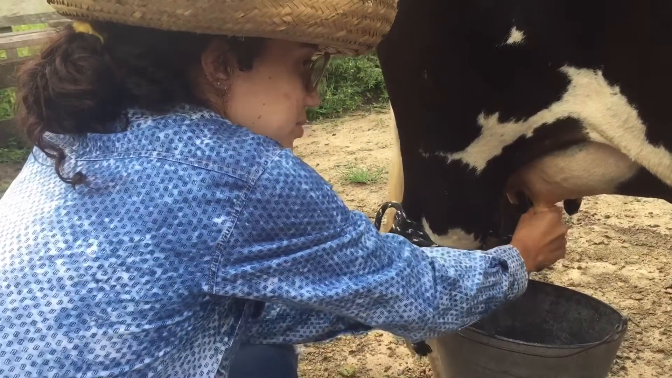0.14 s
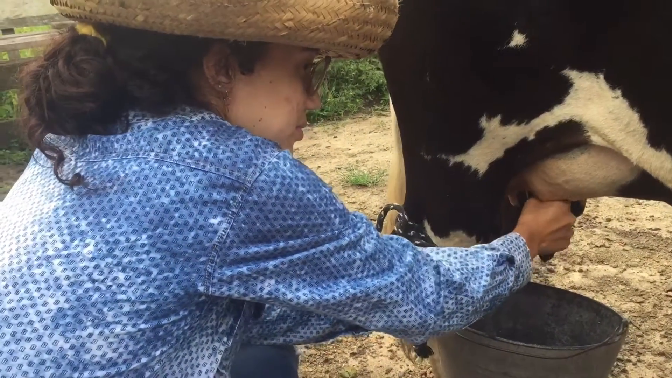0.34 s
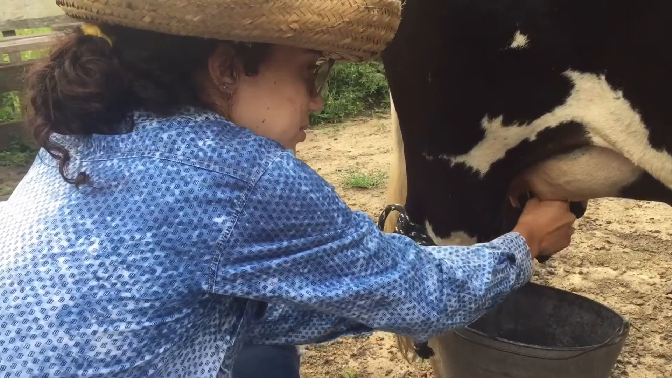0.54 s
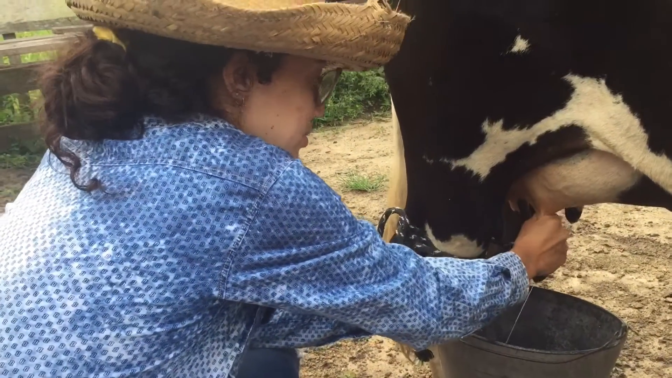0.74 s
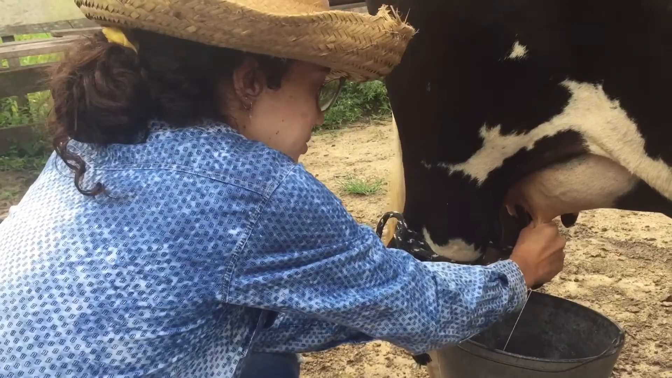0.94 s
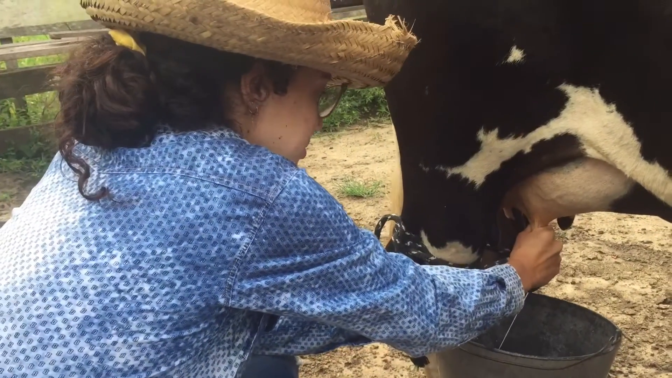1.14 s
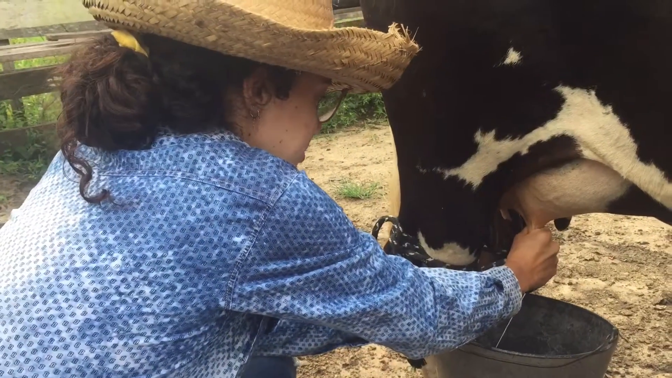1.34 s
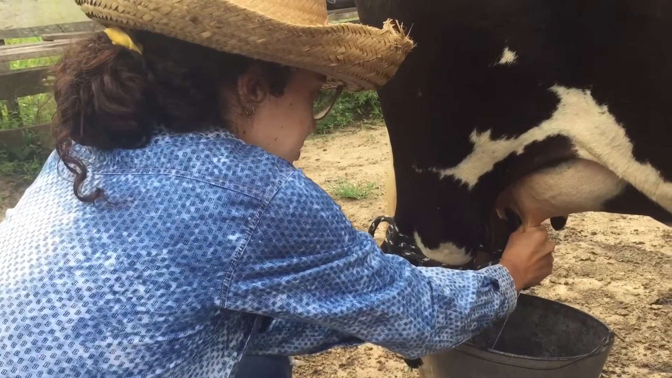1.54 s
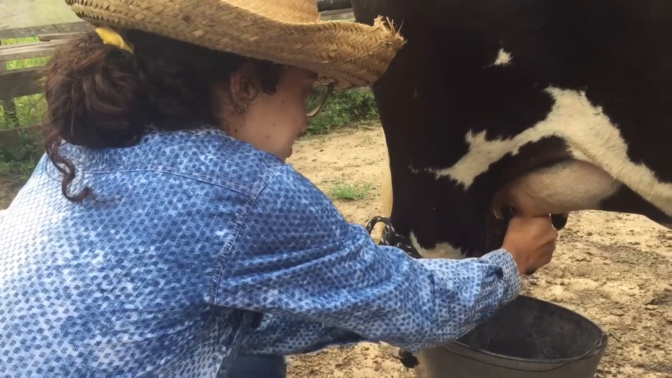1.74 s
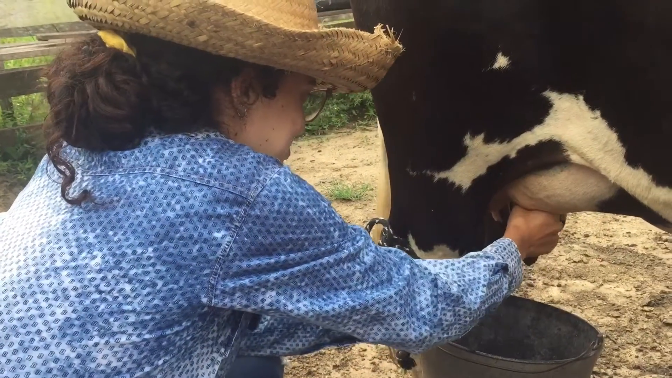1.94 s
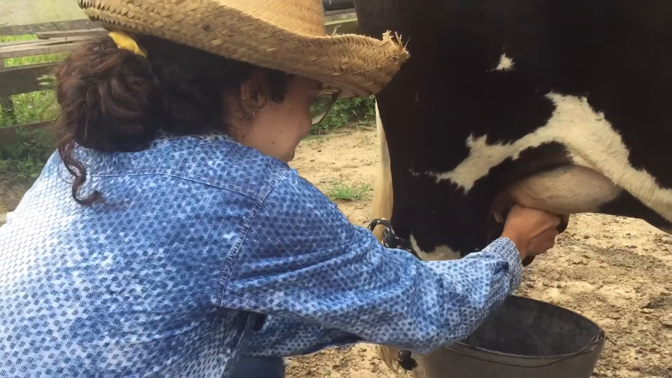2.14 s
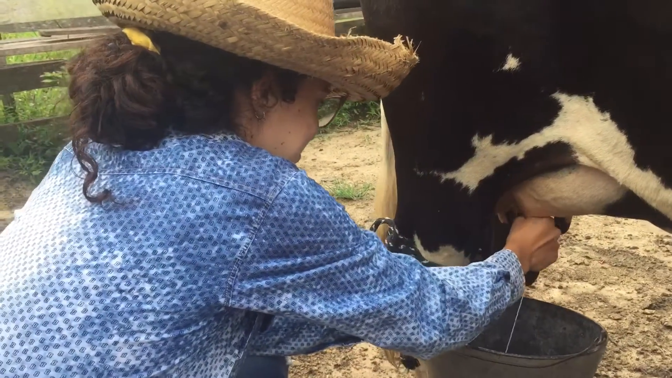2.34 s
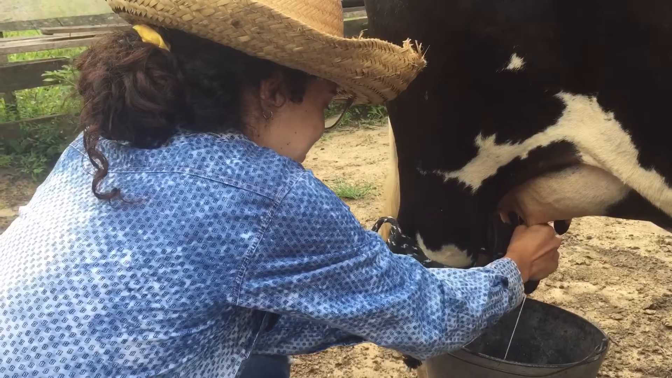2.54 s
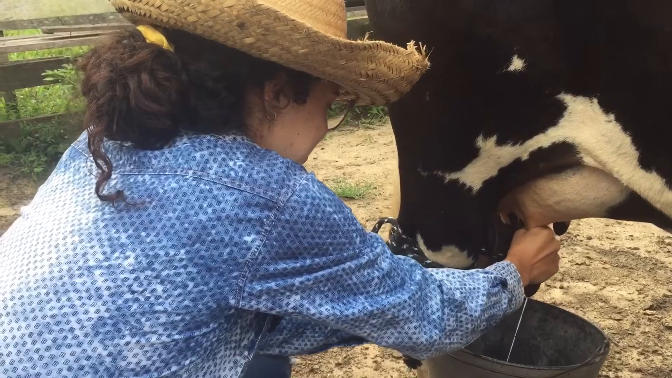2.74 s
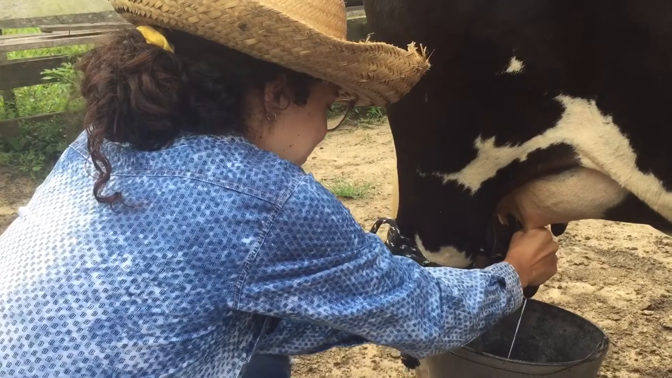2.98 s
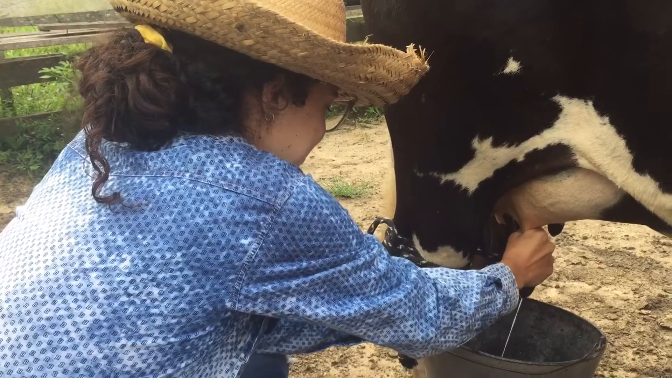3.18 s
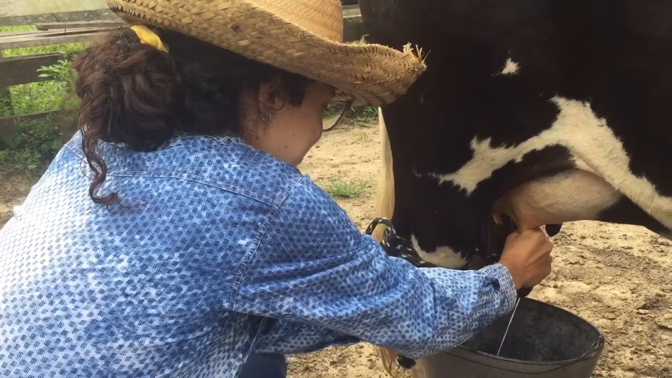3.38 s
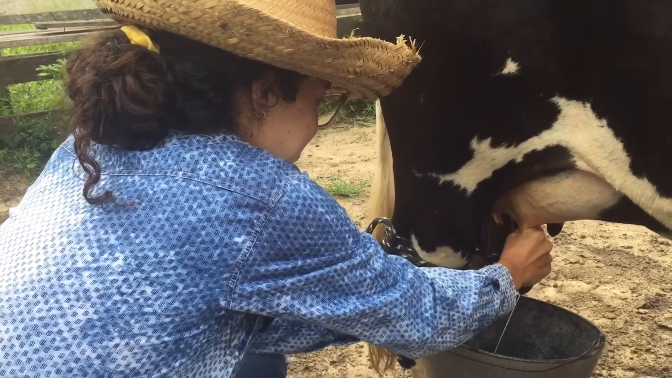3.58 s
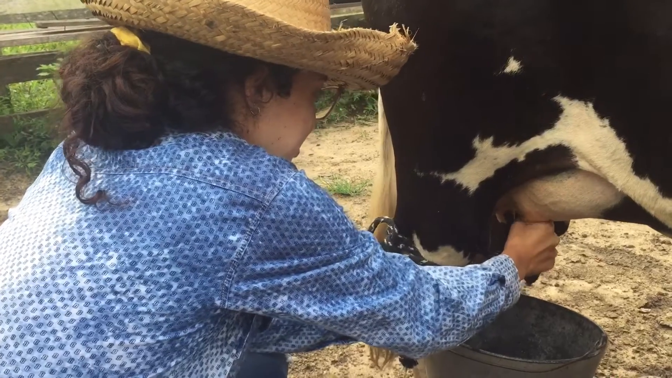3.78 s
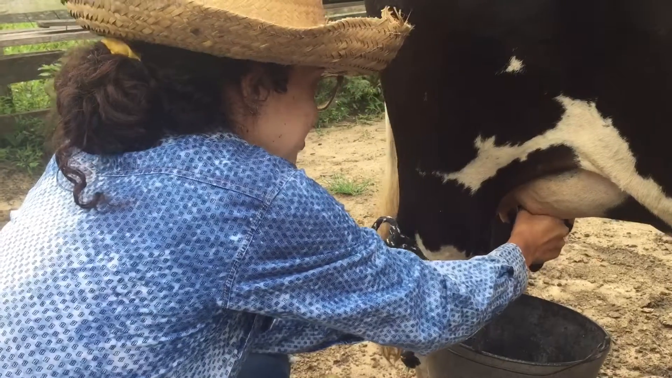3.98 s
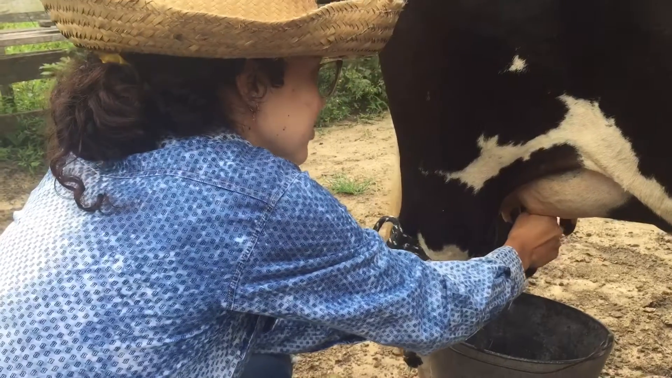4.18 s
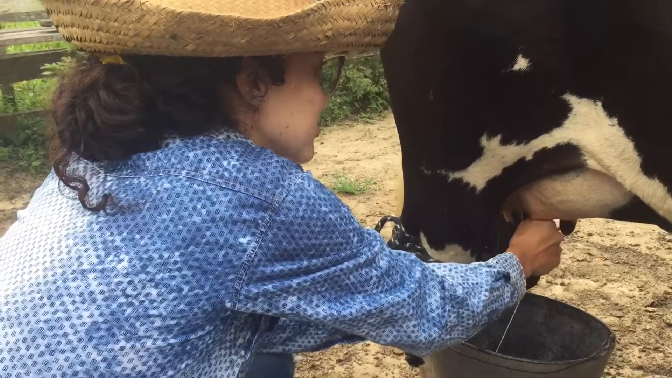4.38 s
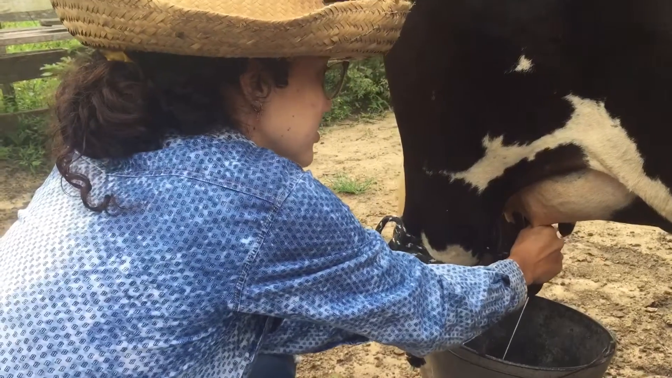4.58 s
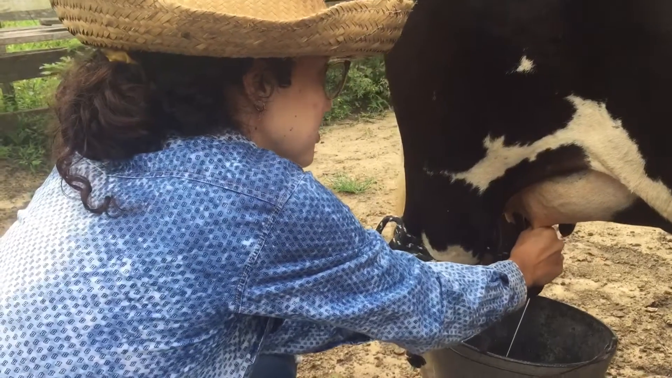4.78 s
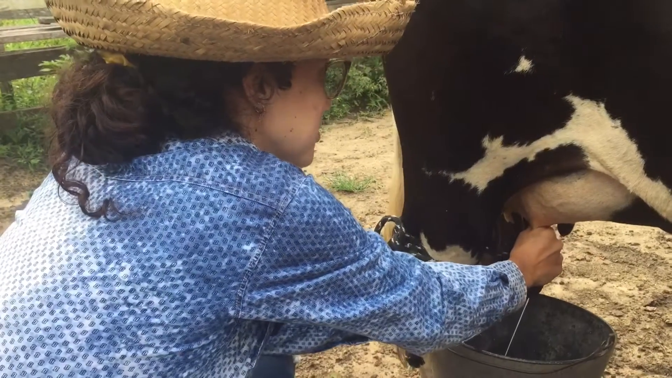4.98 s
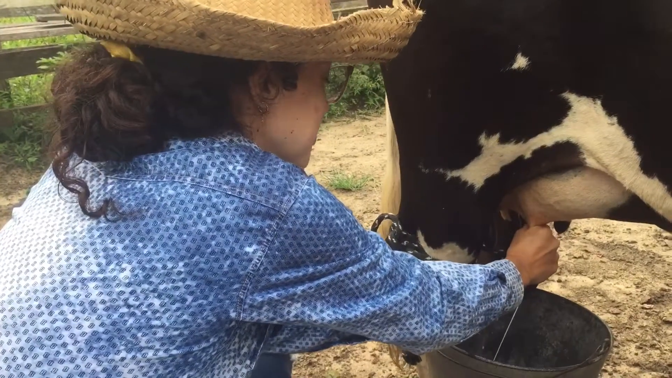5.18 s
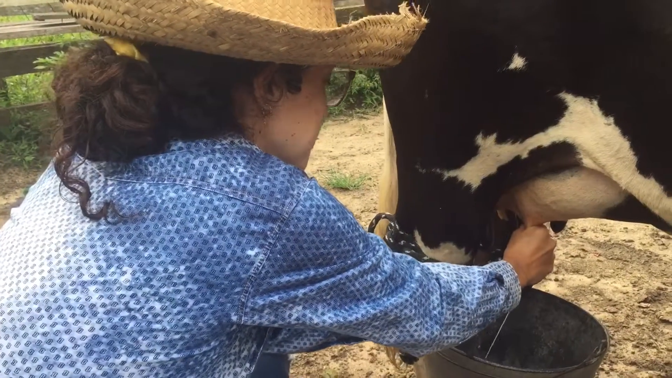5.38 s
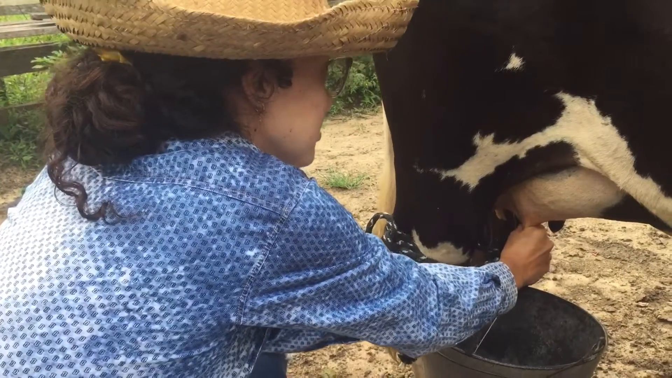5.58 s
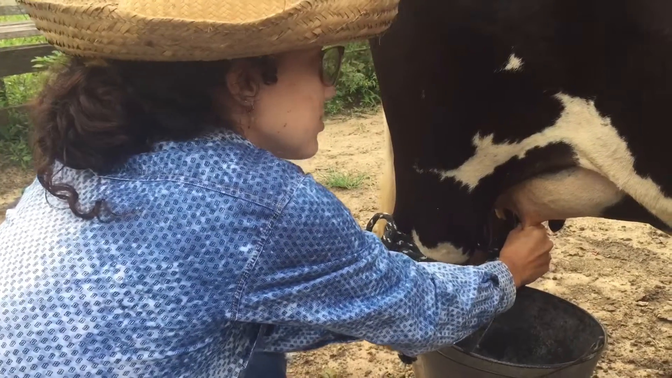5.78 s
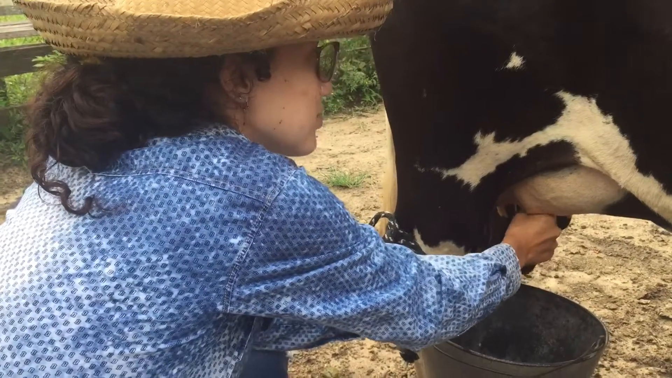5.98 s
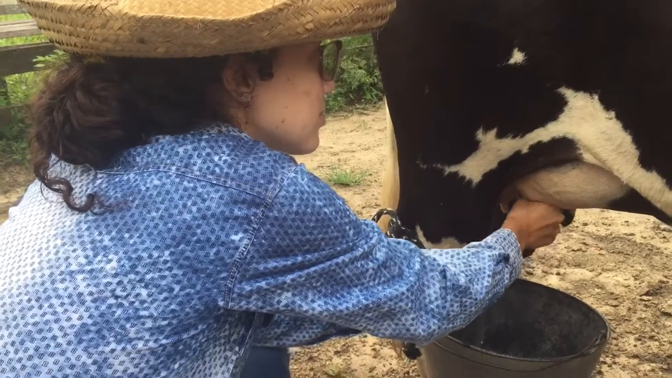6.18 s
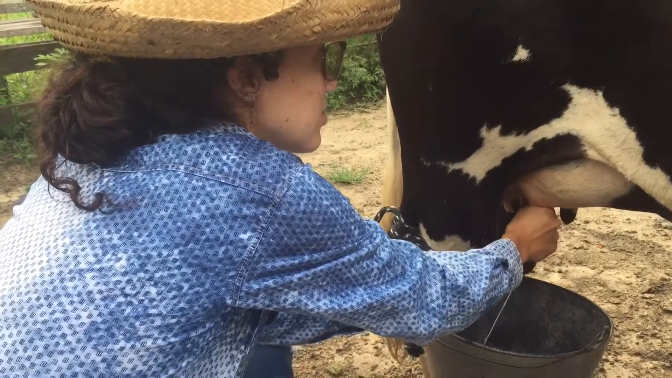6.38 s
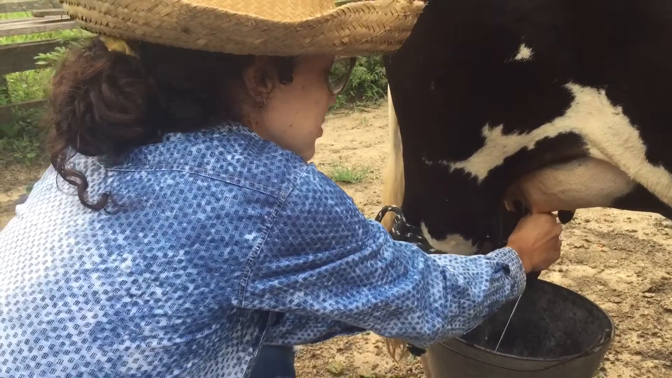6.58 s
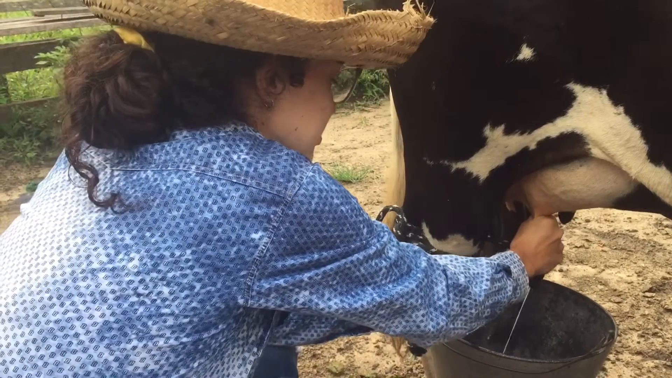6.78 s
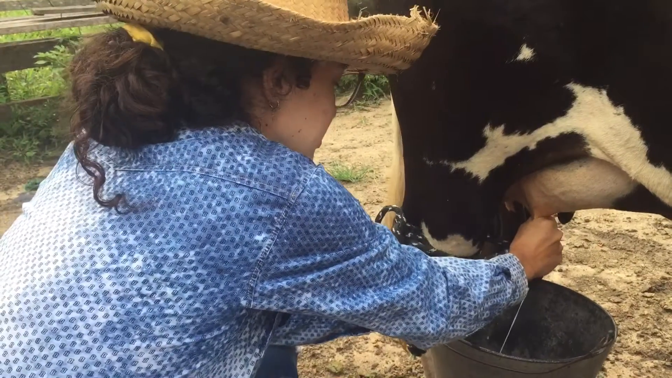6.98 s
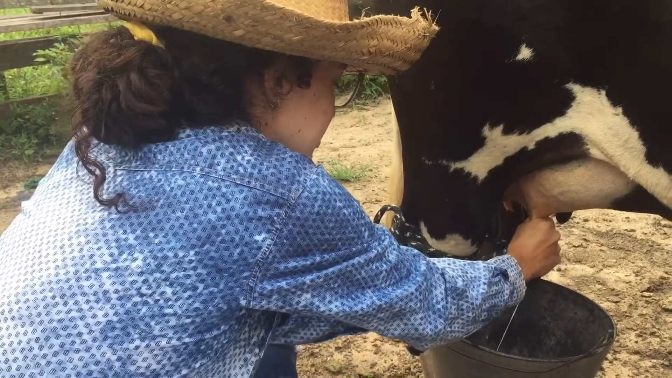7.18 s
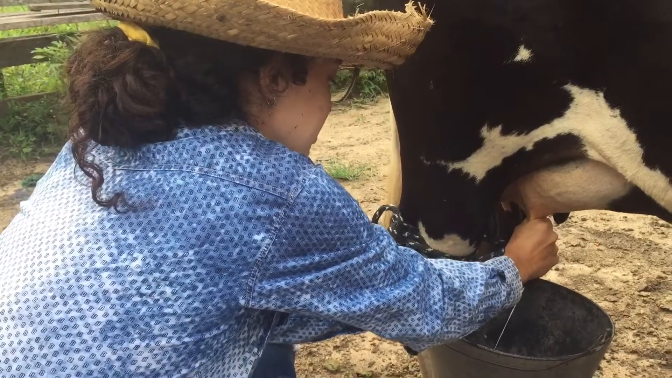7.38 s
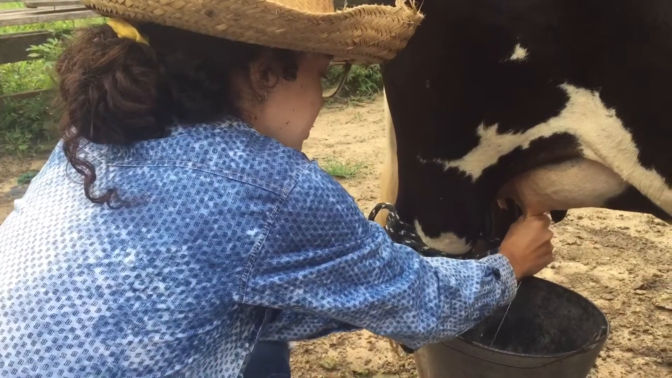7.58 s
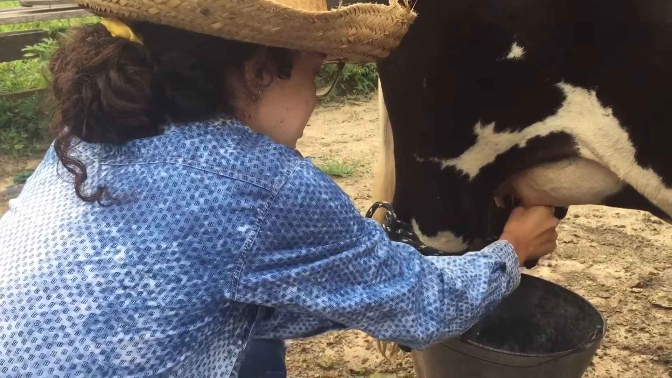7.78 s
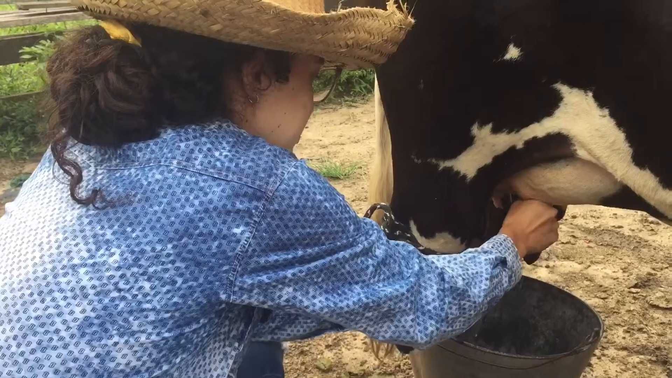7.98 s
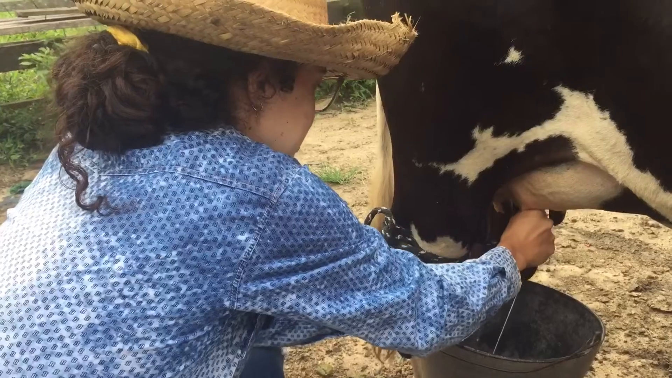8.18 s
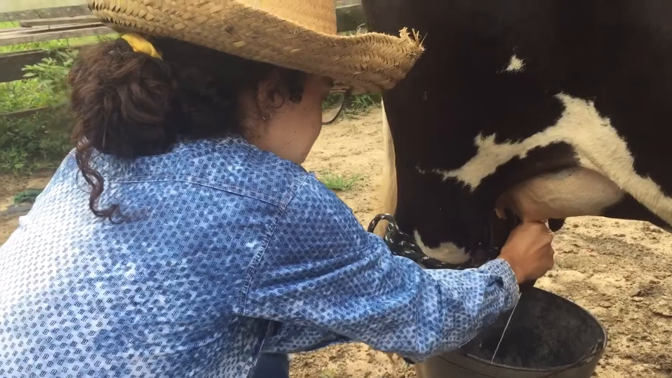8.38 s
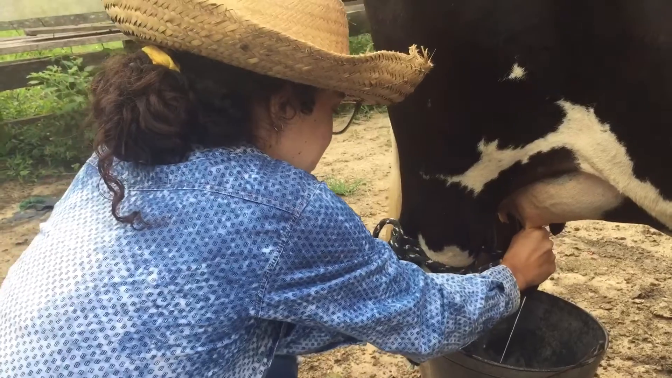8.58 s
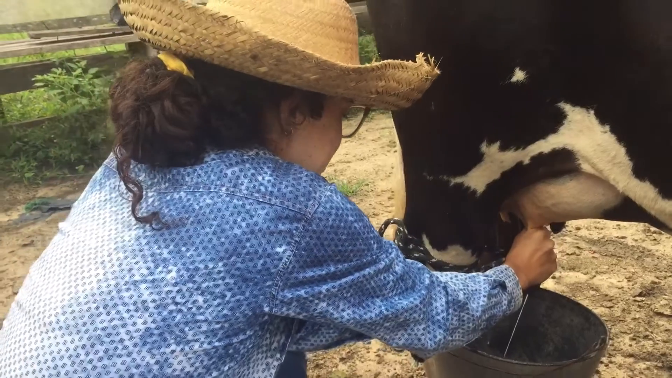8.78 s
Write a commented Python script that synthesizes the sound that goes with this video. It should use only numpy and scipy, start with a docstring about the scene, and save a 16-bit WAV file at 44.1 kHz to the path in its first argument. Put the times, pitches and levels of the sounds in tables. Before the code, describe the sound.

Four long hissing squirts of milk drum into a metal pail outdoors, with cicadas buzzing and chirping and wind bumping the microphone.

```python
"""Four long squirts of milk, drawn from a cow by hand, break into drops that drum in a metal pail outdoors.
Random impacts excite the modes of the pail, its air and its milk; bubbles, spray and wall grazes join them.
Between squirts a slack stream, the same impacts muffled by froth, lands softly, and stray drops snap.
Cicadas buzz and chirp as modulated narrow-band noise and tone; far birds call as resonant noise.
Puffs of wind bump the microphone as short swings of slowing frequency over a rumble and quiet air."""
import sys
import numpy as np
from scipy import signal
from scipy.fft import rfft, irfft, next_fast_len
from scipy.io import wavfile
from scipy.ndimage import uniform_filter1d, map_coordinates

SR = 44100
rng = np.random.default_rng(int(sys.argv[2]) if len(sys.argv) > 2 else 0)


def to_wav(s):
    """Save 16-bit WAV."""
    ch = np.atleast_2d(s).T  # columns
    pcm = np.round(np.clip(ch, -1, 1) * 32767)  # PCM
    wavfile.write(sys.argv[1], SR, pcm.astype(np.int16))


N = 389403

# Levels called nominal are shifted by a constant where they are used.
# Squeezes of the teat: start t/s, crest t/s, end t/s, nominal patter level at the crest/dB,
# swell up to the crest/dB, sag after it/dB, air resonance of the pail f/Hz,
# then nominal levels relative to the patter: boom/dB, drumming/dB, wall ring/dB, initial hiss/dB
SQUEEZES = [(2.414, 2.76, 3.547, -44.5, 14.5, 1, 383, -4, -3.5, -2, 0.5),
            (4.512, 4.827, 5.5, -43.5, 9, 8, 369.7, -2, -5, -7.5, 0),
            (6.659, 7.045, 7.562, -43.5, 7.5, 12, 349.5, -3.5, -2.5, -0.5, 0.5),
            (8.23, 8.327, 9.05, -45, -0.5, 1, 352, -2, -0.5, -4.5, -1.5)]
# Modes of the pail: f/Hz, width/Hz, mean level/dB
PAIL_MODES = [(645, 71, -1.5), (927, 56, -0.5), (1135, 83, -1), (1390, 66, 0.5), (1610, 38, -1),
              (1732, 65, -1), (1950, 92, -3.5), (2270, 57, -5), (2470, 80, -6), (2846, 44, -2),
              (3090, 72, -4), (3375, 61, -5), (3640, 89, -2), (4000, 110, -6.5)]
# Colours of the splash, as filter curves: f/Hz, relative level/dB
PATTER_COLOUR = [(850, -38.5), (1120, 2.5), (1950, 2), (2200, -3), (2600, -27)]
HISS_COLOUR = [(1800, -14), (2250, 2.5), (3300, 1), (4400, -0.5), (4900, 1), (7800, -2.5), (9500, -70)]
SPRAY_COLOUR = [(6000, -76), (7800, -1), (9000, 5), (10300, -2.5), (11500, 0.5), (16000, 0)]
# The bottom, damped by milk to a broad hump: f/Hz, relative level/dB
BOTTOM_COLOUR = [(360, -18), (500, -12.0), (630, 2.5), (780, 1.0), (1000, 8.5), (1250, -28)]
# The jet strays onto the wall and rings one of its modes: start t/s, end t/s, f/Hz, level/dB
WALL_GRAZES = [(2.667, 3.084, 1460, -43.5), (2.88, 2.98, 2490, -44.5), (3.073, 3.284, 1422, -40),
               (3.39, 3.58, 1710, -52.5), (4.606, 4.76, 1447, -46), (7.05, 7.5, 1440, -50.5),
               (6.95, 7.57, 1890, -51.5), (8.47, 8.612, 1397, -47), (8.61, 8.68, 3066, -45)]
# The air of the pail booms harder for a moment: start t/s, end t/s, f/Hz, level/dB
AIR_BOOMS = [(2.46, 2.65, 379.5, -43.5), (4.79, 4.9, 369, -39), (8.66, 8.79, 341, -42.5)]
# The jet digs a hole in the milk: start t/s, end t/s, from f/Hz, to f/Hz, level/dB
MILK_HOLES = [(2.412, 2.58, 1468, 780, -52.5), (4.66, 4.86, 1512, 598, -48.5), (4.7, 4.92, 2300, 1100, -54),
              (5.08, 5.3, 1205, 820, -52), (6.88, 7.16, 1048, 600, -59)]
# The jet fizzes in a band that slides as the squeeze goes on: start t/s, end t/s, from f/Hz, to f/Hz, level/dB
JET_FIZZES = [(4.58, 4.92, 3160, 4050, -58), (6.67, 6.98, 2460, 3040, -51.5),
              (6.7, 6.96, 4450, 4350, -58), (8.48, 8.86, 3810, 4170, -61)]
# The jet sputters into droplets as it starts or runs out: centre t/s, spread t/s, level/dB
SPUTTERS = [(2.448, 0.045, -62), (3.565, 0.044, -56), (3.68, 0.045, -70), (5.54, 0.054, -67.5),
            (6.6, 0.11, -73.5), (6.781, 0.063, -56.5), (7.6, 0.06, -77)]
# The slack stream: start t/s, crest t/s, end t/s, level/dB (a row that ends before it starts is silent)
SLACK_STREAMS = [(-.1, 0.036, 0.16, -58.5), (1.187, 1.4, 1.625, -60.5), (3.45, 3.593, 3.69, -52.5),
                 (4.374, 4.533, 4.83, -60), (5.422, 5.54, 5.61, -56.5), (5.593, 5.75, 5.92, -53.5),
                 (6.49, 6.607, 6.8, -52), (7.36, 7.53, 7.21, -49)]
# Filter curve of the froth: f/Hz, relative level/dB
FROTH_COLOUR = [(850, -11.5), (1320, 11.5), (1950, 7.5), (2300, -3), (3800, -12), (5000, -9), (9000, -16)]
# Last drops that plop into the milk: t/s, level/dB
LAST_DROPS = [(1.048, -44), (3.688, -46), (5.547, -44.5)]
# Snaps: stray drops that snap on the wall, and at 4.532 s the jet's slap as the second squeeze begins: t/s,
# nominal level/dB, centre f/Hz
SNAPS = [(0.8684, -55, 12000), (2.4196, -44, 11000), (2.447, -34.5, 13100), (2.822, -50, 11500),
         (3.0142, -36, 14000), (3.251, -40, 12500), (3.5889, -34, 13000), (3.59, -36, 4370),
         (3.714, -51, 8000), (3.8066, -48.5, 4150), (4.532, -34.5, 2300), (5.2312, -46, 9900),
         (5.4946, -49, 11500), (6.7432, -45, 12500), (7.049, -39, 12000), (8.2284, -37, 12800),
         (8.631, -41.5, 9900)]
# Bands of the far cicadas: f/Hz, width/Hz, steady level/dB
CICADA_BANDS = [(5690, 450, -73.5), (6170, 150, -67), (6430, 750, -70.5), (7187, 150, -67.5)]
# Phrases that swell out of the chorus: start t/s, length t/s, final f/Hz, level/dB
CICADA_PHRASES = [(0.236, 0.84, 6310, -61.5), (1.014, 0.36, 5590, -64), (1.691, 0.83, 6330, -59.5),
                  (1.695, 0.64, 5470, -66), (2.923, 0.85, 6300, -56.5), (4.171, 0.47, 5630, -62.5),
                  (5.572, 0.83, 6280, -59), (6.846, 0.86, 6260, -61), (8.088, 0.42, 5620, -59.5)]
# Chirps of the near cicada: start t/s, end t/s, nominal level/dB
NEAR_CHIRPS = [(0.18, 0.401, -66), (0.396, 0.634, -51), (1.053, 1.333, -61.5), (1.702, 1.96, -51),
               (3.062, 3.298, -51), (3.937, 4.134, -52.5), (4.589, 4.822, -52.5), (5.342, 5.572, -50.5),
               (6.013, 6.244, -50), (6.8, 6.998, -56), (7.449, 7.701, -53), (8.217, 8.423, -55.5)]
# Faint far birds: start t/s, end t/s, f/Hz, level/dB
BIRD_CALLS = [(.26, 1.0, 2150, -75.5), (2.29, 2.39, 3340, -71)]
# Stronger puffs of wind: t/s, nominal level/dB, nominal upper-bass level relative to it/dB
WIND_PUFFS = [(0.047, -45, -7.5), (0.098, -46, -12), (0.325, -42, -18.5), (0.66, -47.5, -19),
              (0.894, -52, -0.5), (1.113, -35, -20), (1.185, -39.5, -11), (1.926, -42, -7),
              (1.976, -33, -4), (2.062, -36, -6.5), (2.152, -41, -2), (2.236, -37.5, -7.5),
              (2.319, -41, -2), (2.38, -37, -11.5), (2.435, -40, -29), (2.811, -40, -14),
              (3.266, -39.5, -10.5), (3.454, -34.5, -10), (4.253, -44.5, -6), (4.38, -34.5, -9),
              (4.551, -31.5, -5.5), (4.614, -33.5, -9), (4.921, -31.5, -5), (5.002, -31, -12),
              (5.234, -34, -4), (5.553, -44, -3), (6.004, -42, -3.5), (6.062, -40, -14), (7.638, -44, -16)]
# Light breeze: t/s, level/dB
BREEZE_LEVEL = [(0, -55.5), (3, -51.5), (3.8, -50), (5.2, -43.5), (6.3, -52.5), (7.1, -68), (7.75, -48.5),
                (8.15, -62), (8.83, -44.5)]
# Spectra of the wind's rumble and flutter, and of the quiet air: f/Hz, relative level/dB
RUMBLE_COLOUR = [(20, -19), (45, 3), (85, -2), (150, -19.5), (350, -34.5)]
FLUTTER_COLOUR = [(60, -8), (115, 13.5), (190, -0.5), (300, -15), (1200, -93)]
AIR_COLOUR = [(60, -9), (300, -2.5), (700, -8.5), (2000, -10), (7500, -19), (9000, -20), (10400, -22.5),
              (11500, -20), (16000, -23)]

ATTACK_S, RELEASE_S = 0.027, 0.031  # the teat opens and shuts
SAG_S = 0.42  # time constant with which the teat empties
DEEP_GROWS, DEEP_FADE_S = 1.7, 0.11  # boom and drumming swing wider in dB and give out before the end
HISS_DULLS_DB_PER_S = 4  # the hiss wanes through a squeeze
SPRAY_DB, SPRAY_GROWS = -15.5, 1  # spray re the flow; dB of spray per dB of force
BUBBLE_DB = -10.5  # bubbles re the patter
RING_HZ = 1408  # mode of the wall
DRIBBLE_SWELL_DB = 13
PHRASE_WIDTH_HZ, PHRASE_FADE_S = 180, 0.17
PHRASE_RISE_HZ, PHRASE_RISE_S = 419, 0.085  # each phrase slides up to its pitch
TOP_HZ = 15850  # band limit of the microphone


def squirts():
    """Forced excitation: jet impacts drive air, bottom, wall, bubbles and spray as each squeeze swells and sags."""
    t = clock()
    stream = drops(rate=5000, scatter_db=0.5) * amp(1.0 * wobble(45))  # the jet breaks up unevenly
    splash = pail_splash(stream)
    gurgle = bubbles(low_hz=651, high_hz=4170, cycles=8.7, rise=0.031, scatter_db=5)
    patter = coloured(splash, PATTER_COLOUR) + amp(BUBBLE_DB) * gurgle
    hiss = coloured(splash, HISS_COLOUR)
    drumming = bottom_drumming(splash)
    ring = unit(resonate(resonate(rng.standard_normal(N), RING_HZ, 96), RING_HZ, 430))
    spray = mist(rate=3000)
    out = np.zeros(N)
    for row in SQUEEZES:
        start, crest, end, db, swell_db, sag_db, cavity_hz, boom_db, drum_db, ring_db, hiss_db = row
        age = np.maximum(t - start, 0)
        force_db = squeeze_force_db(start, crest, swell_db, sag_db)
        flow = amp(db) * (1 - np.exp(-age / ATTACK_S)) * np.exp(-np.maximum(t - end, 0) / RELEASE_S)
        boom = unit(resonate(resonate(stream, cavity_hz, 26), cavity_hz, 85))
        deep = amp(boom_db) * boom + amp(drum_db) * drumming
        deep *= np.clip((end - t) / DEEP_FADE_S, 0, 1)
        bright = patter + amp(hiss_db - HISS_DULLS_DB_PER_S * age) * hiss + amp(ring_db) * ring
        out += flow * amp(force_db - 1.5) * bright
        out += flow * amp(DEEP_GROWS * force_db) * deep
        out += flow * amp(SPRAY_DB + SPRAY_GROWS * force_db) * spray
    out += ringing(WALL_GRAZES, width_hz=67, fade_s=0.05)
    out += ringing(AIR_BOOMS, width_hz=31.0, fade_s=0.074)
    # the note of a hole falls as it deepens
    out += gliding(MILK_HOLES, width_hz=270, fade_s=0.032)
    out += gliding(JET_FIZZES, width_hz=390, fade_s=0.07)
    return out + sputters()


def squeeze_force_db(start, crest, swell_db, sag_db):
    """Pressure in the teat: a power-law approach to the crest, then exponential relaxation as it empties."""
    t = clock()
    before_crest = np.clip((crest - t) / (crest - start), 0, 1)
    emptied = 1 - np.exp(-np.maximum(t - crest, 0) / SAG_S)
    return -swell_db * before_crest ** 1.39 - sag_db * emptied


def drops(rate, scatter_db):
    """Shot noise: impacts fall at random moments with random sizes."""
    hit = rng.random(N) < rate / SR
    size = amp(scatter_db * np.clip(rng.standard_normal(N), -2, 2))
    return unit(hit * rng.standard_normal(N) * size)


def pail_splash(stream):
    """Enclosure acoustics: direct, reflected and reverberant impacts together excite the pail's modes."""
    inside = hollow(stream, t60=.05)
    echoed = wall_echo(stream, delay_ms=1.7, sway=.2, share=.45)
    splash = pail(.4 * unit(inside) + echoed, direct=.3, wander_db=2.6)
    return patchy(splash, patch_db=2, size=3)


def pail(x, direct, wander_db):
    """Modal superposition: the landing point wanders, so each mode is fed now more, now less."""
    modes = np.zeros(N)
    for hz, width, db in PAIL_MODES:
        modes += amp(db + wander_db * wobble(5.7)) * resonate(x, hz, width)
    return modes + direct * x


def wall_echo(x, delay_ms, sway, share):
    """Reflection: the path off the pail's side shifts with the aim of the stream."""
    late = delay_ms / 1000 * SR * (1 + sway * wobble(3))
    return x + share * map_coordinates(x, [np.arange(N) - late], order=1)


def hollow(x, t60, count=3):
    """Reverberation: multiple paths carve fine peaks that shift as the landing point moves."""
    t = np.arange(SR // 10) / SR
    paths = []
    for _ in range(count):
        impulse = amp(-60 * t / t60) * rng.standard_normal(len(t))
        paths.append(signal.oaconvolve(x, impulse)[:N])
    aim = np.array([amp(8 * wobble(2.5)) for _ in paths])
    return np.sum(paths * aim / np.linalg.norm(aim, axis=0), axis=0)


def bottom_drumming(splash):
    """Damped plate: milk on the bottom merges its modes into one hump, struck by splash and further drops."""
    further = coloured(drops(rate=5000, scatter_db=2), BOTTOM_COLOUR)
    return unit(coloured(splash, BOTTOM_COLOUR) + 1.3 * further)


def bubbles(low_hz, high_hz, cycles, rise, scatter_db, count=3000, size=700):
    """Bubble resonance: each small bubble decays briefly at its own rising pitch."""
    when, pitch, strength = rng.random((count, 3)).T[:, :, None]
    k = np.arange(size)
    hz = low_hz * (high_hz / low_hz) ** pitch
    age = k / SR * hz / cycles  # in decay constants
    gain = amp(-scatter_db * np.log(1 - .98 * strength))
    decay = np.exp(-age) * (1 - k / size)
    rings = gain * decay * np.sin(2 * np.pi * cycles * age * (1 + rise * age))
    places = (when * N).astype(int) + k
    return unit(np.bincount(places.ravel(), rings.ravel(), N)[:N])


def mist(rate):
    """Impulse response: fine droplets tick on the wall, the odd larger one snaps, and the pail answers."""
    fine = drops(rate=rate, scatter_db=2) * amp(1.8 * wobble(60))
    ticks = unit(fine + 0.38 * drops(rate=100, scatter_db=7))
    answered = ticks + .95 * unit(hollow(ticks, t60=.035))
    return coloured(patchy(answered, patch_db=2.6, size=9), SPRAY_COLOUR)


def sputters():
    """Jet break-up: scattered droplets swell and fade in Gaussian bursts."""
    t = clock()
    bursts = sum(amp(db) * np.exp(-((t - s) / spread) ** 2) for s, spread, db in SPUTTERS)
    return mist(rate=1300) * bursts


def gliding(rows, width_hz, fade_s):
    """Quadrature modulation: low-pass noise on a sliding carrier makes a bubbling band that changes pitch."""
    out = np.zeros(N + SR)
    low_pass = signal.butter(3, width_hz / 2, fs=SR, output="sos")
    for start, end, from_hz, to_hz, db in rows:
        t = np.arange(round((end - start) * SR)) / SR
        a, b = signal.sosfilt(low_pass, rng.standard_normal((2, SR)))[:, -len(t):]
        phase = 2 * np.pi * np.cumsum(np.geomspace(from_hz, to_hz, len(t))) / SR
        fade = np.sin(np.pi / 2 * np.minimum(np.minimum(t, t[-1] - t) / fade_s, 1))
        tone = unit(a * np.cos(phase) + b * np.sin(phase))
        out[round(start * SR):][:len(t)] += amp(db) * fade * tone
    return out[:N]


def dribbles():
    """Absorption: froth muffles all but the pail's middle modes under the slack stream; last drops ring the wall."""
    drips = patchy(drops(rate=4500, scatter_db=1), patch_db=2, size=3) * amp(0.98 * wobble(22))
    soft = coloured(pail(drips, direct=0.32, wander_db=2.5), FROTH_COLOUR)
    s, db = np.transpose(LAST_DROPS)
    age = np.maximum(clock()[:, None] - s, 0)
    plops = (amp(-60 * age / 0.11) * (1 - np.exp(-age / 0.0013))) @ amp(db)
    tock = 0.86 * np.sin(2 * np.pi * RING_HZ * clock() + wobble(83)) + 0.55 * soft
    trickle = np.zeros(N)
    for start, crest, end, db in SLACK_STREAMS:
        off_crest = np.interp(clock(), [start, crest, end], [1, 0, 1])
        trickle += amp(db - DRIBBLE_SWELL_DB * off_crest ** 1.76) * window(start, end, 0.028)
    return plops * tock + soft * trickle


def spits():
    """Impact transient: each snap is a log-Gaussian band of noise with a fast and a slow decay."""
    out, t = np.zeros(N + SR), np.arange(SR // 10) / SR
    decay = amp(-60 * t / 0.0074) + 0.27 * amp(-60 * t / 0.15)
    for s, db, centre_hz in SNAPS:
        noise = rng.standard_normal(len(t))
        snap = unit(filtered(noise, lambda hz: np.exp(-(np.log2((hz + 1) / centre_hz) / 0.58) ** 2)))
        out[round(s * SR):][:len(t)] += amp(db - 5.0) * decay * snap
    return out[:N]


def chirps():
    """Frequency and amplitude modulation: a near cicada's pulses slide up to pitch, then hold it and grow loud."""
    out = np.zeros(N)
    for start, end, db in NEAR_CHIRPS:
        age = np.arange(round((end - start) * SR)) / SR
        pulse = (51 + rng.normal()) * (age - age[-1]) % 1  # about 51 pulses a second
        opening = 1 / (1 + np.exp(-(age - .05) / 0.0176))
        pitch_hz = 5070 + opening * 305 + 22 * rng.normal()
        pitch_hz = pitch_hz + 200 * (.5 - pulse)  # each pulse droops in pitch
        tone = np.sin(2 * np.pi * np.cumsum(pitch_hz) / SR) + 0.45 * band(pitch_hz, 260)
        swell = (0.31 + opening) * (0.12 + np.sin(np.pi * pulse) ** 1.3)
        out[round(start * SR):][:len(age)] += amp(db - 4.0) * unit(tone * swell)
    return out


def chorus():
    """Superposition: far cicadas buzz in a few bands, out of which rising, trilling phrases swell."""
    out = sum(amp(db) * buzz(hz, width, depth=0.29) for hz, width, db in CICADA_BANDS)
    for s, length, hz, db in CICADA_PHRASES:
        pitch_hz = hz - PHRASE_RISE_HZ * np.exp(-np.maximum(clock() - s, 0) / PHRASE_RISE_S)
        swell = amp(db) * window(s, s + length, PHRASE_FADE_S)
        out += swell * buzz(pitch_hz, PHRASE_WIDTH_HZ, depth=0.22)
    return out


def buzz(hz, width, depth):
    """Amplitude modulation: a cicada's noise band drifts a little in pitch and throbs with its tymbals."""
    throb = 1 + depth * np.sin(2 * np.pi * 58.6 * clock() + 1.5 * wobble(4))
    return unit(band(hz + 22 * wobble(4), width) * throb * amp(wobble(6) + 0.57 * wobble(2)))


def far_birds():
    """Resonant noise: each faint call is a narrow band whose level wavers at random."""
    return ringing(BIRD_CALLS, width_hz=170, fade_s=0.045) * amp(wobble(12))


def wind():
    """Turbulence: each eddy is one short, slowing swing with a flutter on top, over a lumpy rumble."""
    out, flutter = np.zeros(N), np.zeros(N)
    for s, db, upper_db in WIND_PUFFS:
        span = slice(max(round((s - .15) * SR), 0), round((s + .15) * SR))
        t = np.arange(N)[span] / SR - s
        shape = 1 / np.cosh(t / .012)
        swing_hz = 68 * np.exp(0.1475 * rng.standard_normal() - 0.2973 * np.tanh(t / 0.027))
        swing = np.sin(2 * np.pi * (np.cumsum(swing_hz) / SR + rng.random()))
        out[span] += amp(db + 4.5) * shape * swing
        flutter[span] += amp(db + upper_db + 5.0) * shape
    out += flutter * coloured(rng.standard_normal(N), FLUTTER_COLOUR)
    lumps = unit(amp(9 * np.tanh(wobble(15))))
    rumble = coloured(rng.standard_normal(N), RUMBLE_COLOUR)
    return out + level(*np.transpose(BREEZE_LEVEL)) * lumps * rumble


def yard_air():
    """Ambient noise: the quiet air of the yard is a broad, nearly steady spectrum."""
    return amp(-69.5 + 0.063 * wobble(1.8)) * coloured(rng.standard_normal(N), AIR_COLOUR)


def ringing(rows, width_hz, fade_s):
    """Resonance: noise through one narrow mode for each (start/s, end/s, f/Hz, level/dB) row."""
    out = np.zeros(N)
    for start, end, hz, db in rows:
        mode = resonate(resonate(rng.standard_normal(N), hz, width_hz), hz, 3 * width_hz)
        out += amp(db) * window(start, end, fade_s) * unit(mode)
    return out


def resonate(x, hz, width):
    """Simple resonator: one ringing mode of given width."""
    return signal.lfilter(*signal.iirpeak(hz, hz / width, SR), x)


def band(hz, width):
    """Quadrature modulation: narrow noise follows a pitch given sample by sample."""
    noise = rng.standard_normal((2, len(hz) + SR // 10))
    low_pass = signal.butter(2, width / 2, fs=SR, output="sos")
    a, b = signal.sosfilt(low_pass, noise)[:, -len(hz):]
    phase = 2 * np.pi * np.cumsum(hz) / SR
    return unit(a * np.cos(phase) + b * np.sin(phase))


def patchy(x, patch_db, size):
    """Time-varying filtering: patches of random gain, size bins wide, keep changing the colour."""
    z = signal.stft(x, nperseg=512)[2]
    across_bins = uniform_filter1d(rng.standard_normal(z.shape), size, 0)
    field = uniform_filter1d(across_bins, 9, 1)
    return unit(signal.istft(z * amp(patch_db * unit(field)), nperseg=512)[1][:N])


def coloured(x, points):
    """Linear filtering: x is shaped by (f/Hz, level/dB) points, empty above the last, at rms 1."""
    f, db = np.transpose(points)
    return unit(filtered(x, lambda hz: amp(np.interp(np.log(hz + 1), np.log(f), db, right=-120))))


def filtered(x, response):
    """Convolution theorem: the spectrum of x is multiplied by a response of frequency."""
    m = next_fast_len(len(x) + 8192, True)
    return irfft(rfft(x, m) * response(np.fft.rfftfreq(m, 1 / SR)), m)[:len(x)]


def wobble(rate):
    """Random process: a smooth curve through rate random knots a second."""
    steps = np.arange(0, N, 64)
    knots = rng.standard_normal(int(N * rate / SR) + 4)
    return np.interp(np.arange(N), steps, map_coordinates(knots, [steps * rate / SR]))


def window(start, end, fade_s):
    """Envelope: a sine fade in, a hold and a sine fade out."""
    t = clock()
    return np.sin(np.pi / 2 * np.clip(np.minimum(t - start, end - t) / fade_s, 0, 1))


def level(s, db):
    """Envelope: gain follows a dB curve and all but vanishes outside it."""
    return amp(np.interp(clock(), np.r_[s[0] - .008, s, s[-1] + .02], np.r_[-120, db, -120]))


def clock():
    """Sampling: the time of every sample in seconds."""
    return np.arange(N) / SR


def amp(db):
    """Logarithmic level: decibels become an amplitude gain."""
    return 10 ** (np.asarray(db) / 20)


def unit(x):
    """Normalization: scale to rms 1."""
    return x / np.sqrt(np.mean(x ** 2) + 1e-20)


def scene():
    """Superposition: milk, insects, far birds and wind add over the quiet air of the yard."""
    milk = squirts() + dribbles() + spits()
    insects = chirps() + chorus()
    return (milk + insects + far_birds() + wind() + yard_air())[None]


def record(dry):
    """Band limitation: the microphone sheds the deepest bass and keeps nothing above its limit."""
    return filtered(dry[0], lambda hz: (hz < TOP_HZ) * hz ** 4 / (hz ** 4 + 30 ** 4))[None]


dry = scene()
out = record(dry)
to_wav(out)
```